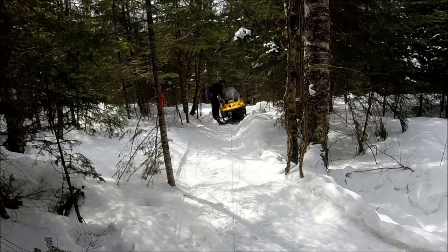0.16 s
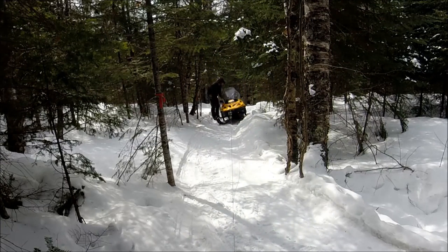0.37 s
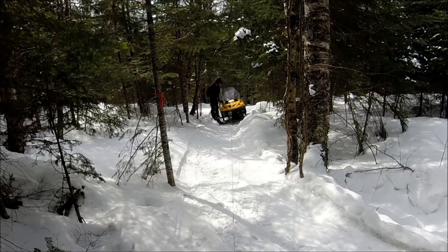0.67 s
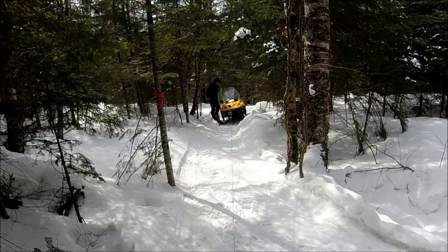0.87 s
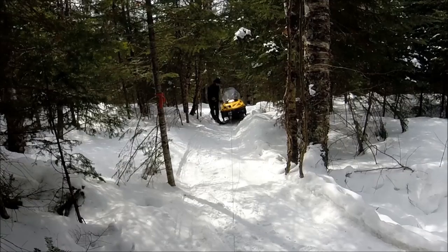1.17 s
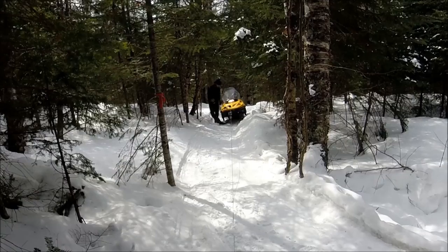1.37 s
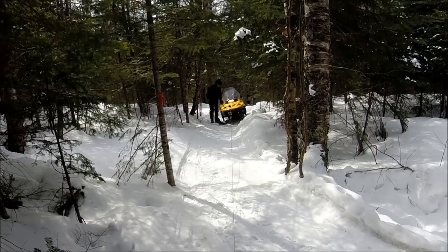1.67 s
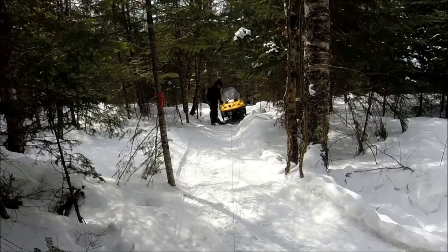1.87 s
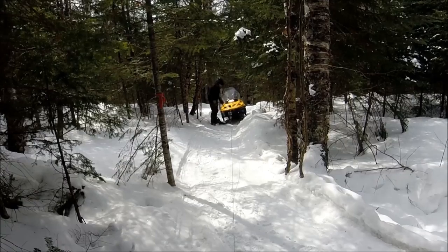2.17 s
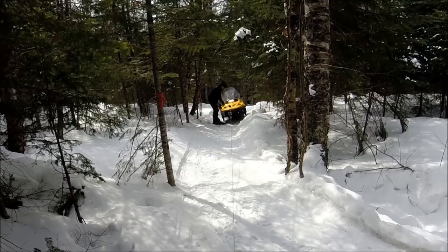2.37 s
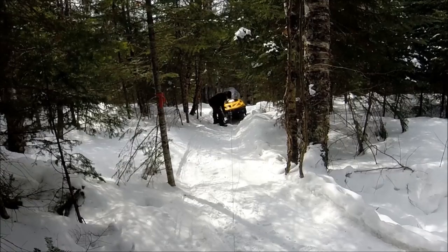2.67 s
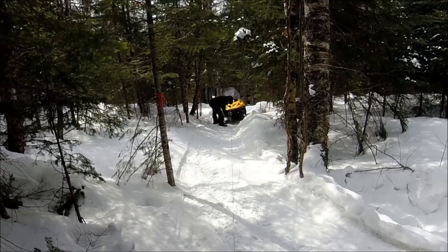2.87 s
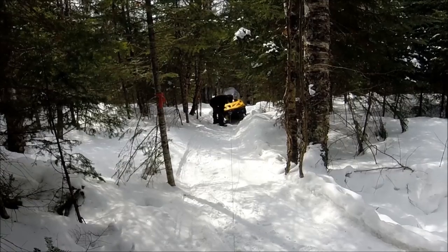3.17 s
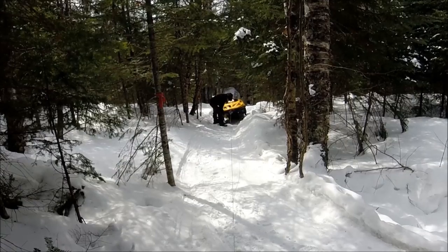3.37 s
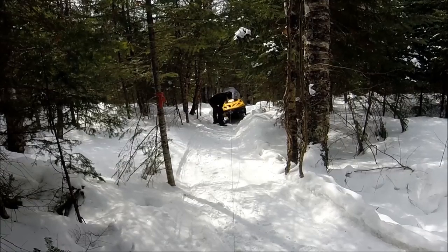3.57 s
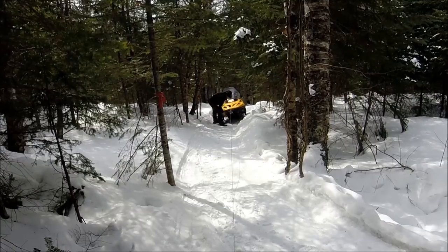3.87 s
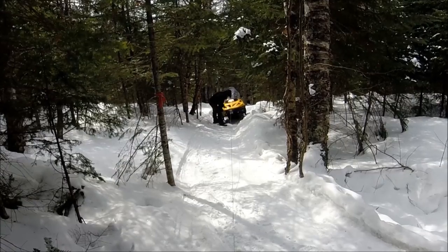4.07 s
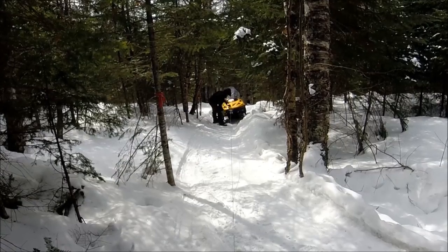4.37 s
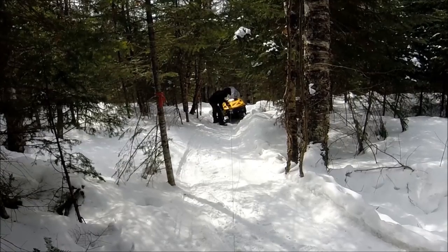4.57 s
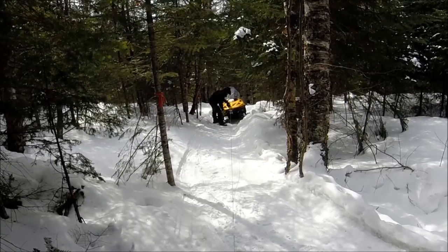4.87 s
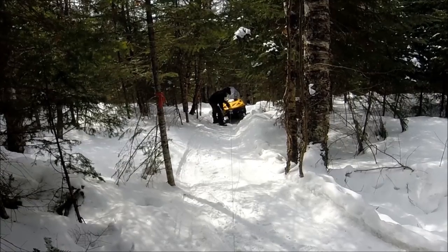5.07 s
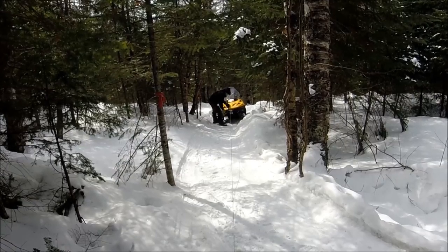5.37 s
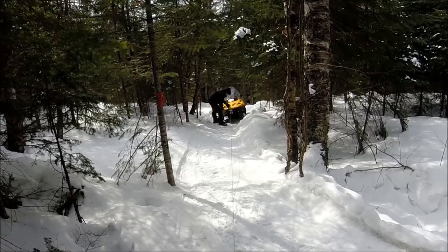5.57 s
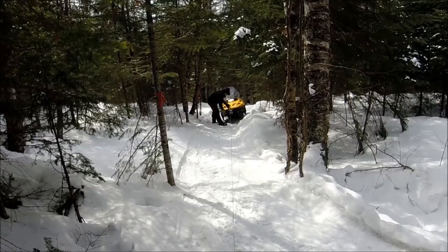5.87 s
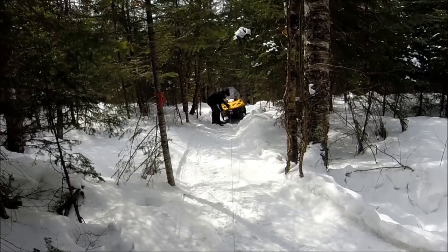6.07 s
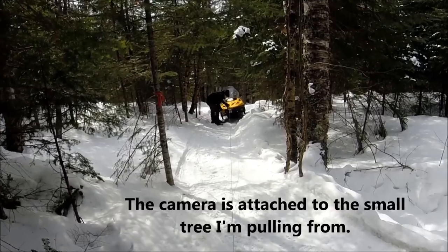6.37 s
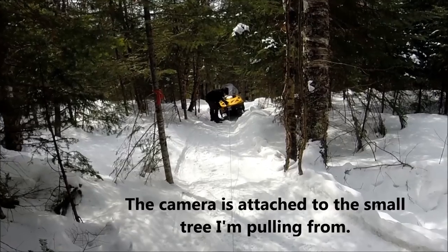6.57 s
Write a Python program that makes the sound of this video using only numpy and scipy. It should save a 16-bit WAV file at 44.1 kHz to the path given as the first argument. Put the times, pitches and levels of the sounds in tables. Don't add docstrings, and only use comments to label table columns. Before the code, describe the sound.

A snowmobile some distance away cranks with a quick rasp, then idles unevenly: low pulsing strokes, scattered single and paired pops, airy exhaust puffs and rattling panels. Light metallic taps and a dragging boot come late in the idle. A brief dropout breaks the scene; the engine resumes and an electric winch bursts in close and loud, its taut rope sending whine, gritty grind and creaks into the tree trunk holding the microphone.

```python
import sys
import numpy as np
from scipy import signal
from scipy.fft import rfft, irfft
from scipy.io import wavfile
from scipy.ndimage import uniform_filter1d, minimum_filter1d

SR = 44100
rng = np.random.default_rng(int(sys.argv[2]) if len(sys.argv) > 2 else 0)


def to_linear_factor(level_db):
    exponent = np.asarray(level_db, float) / 20
    return 10 ** exponent


def wav_record(signal):
    frames = np.transpose(np.atleast_2d(signal))
    bounded = np.clip(frames, -1, 1)
    quanta = np.round(bounded * 32767).astype(np.int16)
    wavfile.write(sys.argv[1], SR, quanta)


N = 295911
t = np.arange(N) / SR

# f/Hz, level/dB per Hz
STARTER_TONE = [(180, -17), (300, 0), (377, -15.5), (467, -14), (507, -8), (559, -2), (913, 8), (2820, -12),
                (3380, -2), (4050, -1), (5350, 1.5), (7790, -16.5), (8740, -12), (15000, -35.5)]
# f/Hz, width/Hz, lift/dB
STARTER_RINGS = [(860, 70, 6), (1040, 60, 5), (1260, 120, 7), (1600, 200, 8), (2200, 50, 6), (3430, 70, 7),
                 (3660, 70, 6), (4520, 90, 8), (5370, 70, 8), (8680, 300, 8), (9910, 200, 11)]
# t/s, f/Hz
STROKE_RATE = [(0, 29), (.3, 35.5), (.9, 39), (1.1, 43), (1.4, 45.5), (2, 47), (4.7, 47.5), (5.1, 50.5),
               (5.7, 50.5), (6.2, 48.5), (6.7, 50)]
# t/s, level/dB
EFFORT = [(0, -15), (.1, -4), (.5, -5), (1.0, 2), (1.25, 0), (2.4, 0.5), (3.8, 1.5), (5.1, 2), (6.2, 2.5),
          (6.5, 3.5), (6.71, 2)]
# f/Hz, width/Hz, level/dB
SILENCER = [(56.5, 5.9, 12), (61.7, 6.1, 19)]
# f/Hz, level/dB per Hz
CLATTER = [(22, -0.5), (45, 8.5), (110, 5.5), (220, -4.5), (320, -10.5), (490, -8), (610, -17.5),
           (960, -2.5), (1190, -10), (1430, -19), (1820, -18.5), (2800, -32), (3300, -27.5), (6800, -44),
           (16000, -55)]
# f/Hz, width/Hz, lift/dB
PANELS = [(3390, 150, 1.5), (770, 50, 6), (950, 60, 4), (1170, 70, 7), (1810, 60, 6), (2370, 16, 5),
          (3450, 300, 2), (5050, 300, 2)]
# t/s, level/dB
LONERS = [(.1363, -30.5), (.1803, -26), (.3237, -29), (.3817, -29.5), (2.4302, -25.5), (2.666, -27),
          (2.8596, -28.5), (3.2812, -31.5), (3.389, -32), (4.024, -30), (6.375, -27.5), (6.537, -21.5),
          (6.679, -26)]
# t/s, first level/dB, second level/dB
DOUBLES = [(.211, -28.5, -23), (1.1342, -27.5, -25), (1.2708, -28.5, -24.5), (1.3332, -39, -32.5),
           (1.4243, -27.5, -23), (1.708, -24, -28.5), (1.9384, -27.5, -37), (2.131, -32, -29.5),
           (2.2989, -29, -30), (2.5365, -27, -26.5), (2.773, -36, -26), (2.9668, -27, -28),
           (3.092, -30.5, -26), (3.3031, -35.5, -33), (3.474, -27.5, -34), (3.5823, -28.5, -27),
           (3.7094, -25, -26), (3.8344, -25, -28), (3.94, -32, -27.5), (4.3012, -27, -27),
           (4.4254, -25, -28.5), (4.7423, -28.5, -24.5), (5.3704, -30.5, -24.5), (5.5287, -24.5, -22)]
# t/s, first level/dB, second level/dB
ANSWERS = [(.467, -26.5, -27), (.633, -26, -28.5), (.7934, -26.5, -29.5), (.9444, -25.5, -26),
           (1.511, -29, -24), (1.813, -28, -26.5), (2.0015, -28, -28.5), (2.172, -26.5, -27.5),
           (3.1754, -29.5, -31), (4.1305, -26, -29), (4.5729, -26, -27.5), (4.8685, -26.5, -24),
           (5.0331, -25, -24.5), (5.1923, -24.5, -27.5), (5.6855, -23.5, -27.5), (5.8475, -23.5, -27.5),
           (6.0082, -24.5, -26), (6.1713, -24.5, -25)]
# f/Hz, width/Hz, level/dB
BANG_RING = [(482, 19.4, -0.5), (514.5, 8.6, 0.5), (463, 81, -16.5), (380, 100, -15.5), (910, 180, -32.5)]
# f/Hz, level/dB per Hz
JET = [(2500, -58.5), (4800, 10.5), (7200, -13), (8700, -1), (10200, -23.5), (15000, -30)]
# f/Hz, level/dB per Hz
GAS = [(600, 3), (1000, -1.5), (2000, -4.5), (2800, -14.5), (3500, -9.5), (5200, -15), (6300, -16),
       (7200, -25.5), (8700, -25), (15000, -41.5)]
# t/s, level/dB, f/Hz
KNOCKS = [
    (0.77, -34, 1070),
    (4.299, -21, 830),
    (4.991, -25, 940),
    (5.946, -29, 1000),
]
# t/s, level/dB
WINCH_EFFORT = [
    (6.343, -24.5),
    (6.349, -7),
    (6.365, 2),
    (6.4, -1),
    (6.45, -4),
    (6.5, 1.5),
    (6.56, -1.5),
    (6.63, -1),
    (6.71, 2),
]
# multiple of pitch/1, level/dB
WHINE = [(1, 1), (2, -1.5), (3, -1), (4, -12.5), (5, -13.5), (6, -33), (8, -36), (10, -39)]
# f/Hz, width/Hz, level/dB
TRUNK = [(868, 153, 0.5), (441, 33, -8.5), (1070, 37, -32.5), (1094, 81, -42), (1553, 130, -25),
         (1320, 1500, -28.5), (2675, 870, -40), (195, 150, -17.5)]
# t/s, peak level/dB, f/Hz, length/ms
SHUDDERS = [(6.3594, -12, 792, 18), (6.3679, -10, 830, 2.4), (6.391, 1, 831, 13.3), (6.4119, -9.5, 860, 16),
            (6.4299, -12.5, 887, 8.6), (6.451, -9, 862, 15), (6.4744, -6.5, 850, 6.6),
            (6.4869, -10, 816, 19), (6.5098, -11, 884, 27), (6.5601, -11, 905, 7.8),
            (6.5902, -8.5, 870, 7.3), (6.613, -5, 873, 14), (6.6237, -9.5, 884, 20.2),
            (6.6595, -26, 848, 6.9), (6.6747, -13.5, 920, 15), (6.6907, -3.5, 905, 11),
            (6.7034, -6.5, 895, 8.6)]
# t/s, level/dB, f/Hz
CREAKS = [
    (6.3847, -42.5, 2200),
    (6.4566, -29.5, 3020),
    (6.533, -24, 2340),
    (6.64, -30, 3360),
    (6.6964, -23, 2190),
]
# start t/s, end t/s
SILENCE_S = (6.1953, 6.2286)

STARTER_DB, STARTER_SWELL_DB_S, STARTER_OFF_S, STARTER_FADE_DB_S = -40, 23, .23, 438
STARTER_TAIL_DB, STARTER_TAIL_DB_S = -51, 120
PUMP_DB, KICK_DB, KICK_S = -38, .5, .042
CLATTER_DB, CLATTER_PER_EFFORT = -58.5, .4
HUM_DB, HUM_PEAK_S, HUM_NARROW_DB = -50, .44, 18
FIRED_SPEEDUP = 1.012
BANG_MS, DIP_MS, JET_RISE_S = 5.0, 4.5, .0035
HISS_DB, HISS_PER_BANG_DB = -53, 1.39
COLD_S, COLD_SPREAD_S, COLD_BOOM_DB, COLD_GULP_DB = 1.1, .08, 4, -14
WARM_S, WARM_SPREAD_S, WARM_GULP_DB = 3.4, .25, -16
GULP_DB, GULP_AT_STROKE, GULP_WIDTH_STROKE = -41.5, .1, .1
KNOCK_MS, SNAP_DB = .5, 6
SCRAPE_S, SCRAPE_WIDTH_S, SCRAPE_DB, SCRAPE_HZ = 4.24, .094, -45, 850
WINCH_ON_S, SPIN_UP_S, SPIN_UP_SHAPE = 6.343, .034, 1.4
START_HZ, RUN_HZ, SAG_HZ_S2 = 145.3, 325.2, 107
WHINE_DB, WHINE_PER_EFFORT, FLICKER_DB, GRIND_DB = -27, .49, 1.4, -20
SURGE_DB, SURGE_S, SURGE_WIDTH_S = 8, .022, .013


def rms1(x):
    return x / np.sqrt(np.mean(x ** 2))


def band(x, hz, width_hz):
    return signal.lfilter(*signal.iirpeak(hz, hz / width_hz, fs=SR), x)


def body(x, modes):
    return sum(to_linear_factor(db) * band(x, hz, width_hz) for hz, width_hz, db in modes)


def butter(x, order, hz, kind="low"):
    return signal.sosfilt(signal.butter(order, hz, kind, fs=SR, output="sos"), x)


def walk(rate_hz):
    k = int(SR / rate_hz)
    return rms1(uniform_filter1d(uniform_filter1d(rng.standard_normal(N), k), k))


def noise(tone, rings=(), modes_db=3.0):
    f = np.fft.rfftfreq(N, 1 / SR) + 1
    hz, db = np.transpose(tone)
    db = np.interp(np.log(f), np.log(hz), db, left=-90, right=-90)
    db = db + sum(lift_db / (1 + (2 * (f - c) / w) ** 2) for c, w, lift_db in rings)
    db = db + modes_db * walk(170)[:len(f)]
    return rms1(irfft(rfft(rng.standard_normal(N)) * to_linear_factor(db), N))


def narrow_noise(hz1, width1_hz, hz2, width2_hz):
    return rms1(band(band(rng.standard_normal(N), hz1, width1_hz), hz2, width2_hz))


def curve(rows):
    return np.interp(t, *np.transpose(rows))


def spikes(s, db, push_ms=0):
    x = np.zeros(N)
    x[np.clip((np.asarray(s) * SR).astype(int), 0, N - 1)] = to_linear_factor(db)
    return np.convolve(x, np.hanning(int(push_ms * SR / 1000) + 3)[1:-1])[:N]


def fade(x, tau_s):
    return signal.lfilter([1], [1, -np.exp(-1 / (tau_s * SR))], x)


def starter():
    level_db = STARTER_DB + STARTER_SWELL_DB_S * t - STARTER_FADE_DB_S * np.maximum(t - STARTER_OFF_S, 0)
    tail_db = STARTER_TAIL_DB - STARTER_TAIL_DB_S * np.abs(t - STARTER_OFF_S)
    grind = noise(STARTER_TONE, STARTER_RINGS, modes_db=2.5)
    n = np.arange(N)
    grind = np.interp(n + np.cumsum(.013 * walk(14.85)), n, grind)
    low = butter(grind, 4, 2500) * to_linear_factor(2.9 * walk(73))
    high = butter(grind, 4, 2500, "high") * to_linear_factor(-3.5 + 2.9 * walk(70))
    return (low + high) * to_linear_factor(np.maximum(level_db, tail_db))


def firings():
    rows = list(LONERS)
    for table, strokes in ((DOUBLES, 1), (ANSWERS, 3)):
        for s, first_db, second_db in table:
            rate_hz = FIRED_SPEEDUP * np.interp(s + .03, *np.transpose(STROKE_RATE))
            rows += [(s, first_db), (s + strokes / rate_hz, second_db)]
    return np.transpose(sorted(rows))


def crank(s):
    s = np.r_[-.03, s, 6.76]
    gaps_s = np.diff(s)
    count = np.round(gaps_s * np.interp(s[1:] - gaps_s / 2, *np.transpose(STROKE_RATE)))
    return np.interp(t, s, np.r_[0, np.cumsum(count)]) + .9 + .02 * walk(30)


def engine_effort(s, bang_db):
    kick = rms1(fade(fade(spikes(s, bang_db), KICK_S), .024))
    return curve(EFFORT) + KICK_DB * (kick - 1)


def pump(turn, effort_db):
    size = to_linear_factor(.57 * rng.standard_normal(400))[turn.astype(int)]
    saw = ((turn % 1) ** 2.6 - 1 / 3.6) * size
    saw = signal.sosfiltfilt(signal.butter(2, 230, fs=SR, output="sos"), saw)
    return rms1(saw - saw.mean() + body(saw, SILENCER[:1])) * to_linear_factor(PUMP_DB + effort_db)


def clatter(turn, effort_db):
    beat_db = .82 * np.cos(2 * np.pi * (turn - .3)) + 1.58 * walk(43)
    return noise(CLATTER, PANELS) * to_linear_factor(beat_db + CLATTER_DB + CLATTER_PER_EFFORT * effort_db + 19)


def rattle():
    return narrow_noise(3412, 60, 3432, 120) * to_linear_factor(-84 + 6 * walk(12))


def hum():
    tone = np.sin(2 * np.pi * np.cumsum(476 + 9 * walk(25)) / SR)
    level_db = HUM_DB - HUM_NARROW_DB * np.log((t + .05) / HUM_PEAK_S) ** 2 + 3.5 * walk(40)
    return tone * to_linear_factor(level_db)


def coldness():
    return 1 / (1 + np.exp((t - COLD_S) / COLD_SPREAD_S))


def bangs(s, bang_db):
    push = spikes(s - .0016, bang_db, push_ms=BANG_MS)
    dip = spikes(s - .0048, bang_db - 5, push_ms=DIP_MS)
    boom = body(spikes(s - .006, bang_db - 24.5, push_ms=BANG_MS), SILENCER[1:])
    ring = body(spikes(s - .0037, bang_db + 12.5, push_ms=.71), BANG_RING)
    return push - dip + boom * to_linear_factor(COLD_BOOM_DB * coldness()) - ring


def gas_hiss(s, bang_db):
    gas_db = HISS_DB + HISS_PER_BANG_DB * (bang_db + 27)
    puffs = spikes(s - .008, 2 * gas_db)
    jet_power = fade(fade(puffs, JET_RISE_S), .0077)
    jet = noise(JET, [(8620, 790, 6.5), (5230, 370, 7.2)]) * np.sqrt(jet_power) * to_linear_factor(-23.5)
    tail_power = fade(fade(puffs, .018) + to_linear_factor(-17.5) * fade(puffs, .074), .0054)
    return jet + noise(GAS, PANELS) * np.sqrt(tail_power) * to_linear_factor(-18.5)


def intake_gulp(turn):
    gulp = np.exp(-(((turn - GULP_AT_STROKE + .5) % 1 - .5) / GULP_WIDTH_STROKE) ** 2)
    warm = 1 / (1 + np.exp((WARM_S - t) / WARM_SPREAD_S))
    level_db = GULP_DB + COLD_GULP_DB * coldness() + WARM_GULP_DB * warm + 1.1 * walk(30)
    return (gulp - gulp.mean()) * to_linear_factor(level_db)


def engine():
    s, bang_db = firings()
    turn = crank(s)
    effort_db = engine_effort(s, bang_db)
    breath = pump(turn, effort_db) - intake_gulp(turn)
    exhaust = hum() + bangs(s, bang_db) + gas_hiss(s, bang_db)
    return breath + exhaust + clatter(turn, effort_db) + rattle()


def knocks():
    metal = 0
    for s, db, hz in KNOCKS:
        hit = spikes([s], db + 17, push_ms=KNOCK_MS)
        metal = metal + band(band(hit, hz, 135), 1.4 * hz, 1400)
    s, db, _ = np.transpose(KNOCKS)
    return metal + band(spikes(s, db - SNAP_DB), 2200, 1800)


def boot_scrape():
    drag = narrow_noise(SCRAPE_HZ, 190, SCRAPE_HZ, 300) * to_linear_factor(SCRAPE_DB + 3.6 * walk(65))
    return drag * np.exp(-((t - SCRAPE_S) / SCRAPE_WIDTH_S) ** 2)


def winch_whine(on_s, effort_db):
    spin_up = np.exp(-(on_s / SPIN_UP_S) ** SPIN_UP_SHAPE)
    hz = RUN_HZ - (RUN_HZ - START_HZ) * spin_up - SAG_HZ_S2 * on_s ** 2
    phase = 2 * np.pi * np.cumsum(hz * (1 + .0039 * walk(66))) / SR
    surge_db = SURGE_DB * np.exp(-((on_s - SURGE_S) / SURGE_WIDTH_S) ** 2)
    slack_db = 55 * np.clip(1 - hz / 319, 0, 1) * (t < 6.5)
    lines = 0
    for k, db in WHINE:
        line_db = db + FLICKER_DB * np.sqrt(k) * walk(79) - k * slack_db
        lines = lines + to_linear_factor(line_db) * np.sin(round(k) * phase)
    return lines * np.sqrt(2) * to_linear_factor(WHINE_DB + WHINE_PER_EFFORT * effort_db + surge_db)


def winch_grind(effort_db):
    teeth = rng.standard_normal(N) * to_linear_factor(1.8 * walk(220))
    grind = sum(to_linear_factor(db) * rms1(band(band(teeth, hz, w), hz, .78 * w)) for hz, w, db in TRUNK)
    return grind * to_linear_factor(GRIND_DB + effort_db)


def winch():
    on_s = np.maximum(t - WINCH_ON_S, 0)
    effort_db = curve(WINCH_EFFORT)
    return (on_s > 0) * (winch_whine(on_s, effort_db) + winch_grind(effort_db))


def rope_shudders():
    slips = 0
    for s, db, hz, ms in SHUDDERS:
        burst = np.exp(-(1665 * (t - s) / ms) ** 2)
        slips = slips + to_linear_factor(db) * burst * np.sin(2 * np.pi * hz * (t - s))
    return to_linear_factor(-.5) * slips


def bark_creaks():
    return sum(band(band(spikes([s], db + 25.5), hz, 250), hz, 500) for s, db, hz in CREAKS)


def scene():
    sled = engine() + starter() + knocks() + boot_scrape()
    return (sled + winch() + rope_shudders() + bark_creaks())[None]


def roll_off(x):
    return signal.sosfilt(signal.butter(12, 15630, fs=SR, output="sos"), x)


def record(dry):
    dry = butter(dry, 1, 15, "high")
    dull = signal.sosfilt(signal.ellip(8, .3, 50, 15150, fs=SR, output="sos"), dry)
    room = minimum_filter1d(np.minimum(.96 / (np.abs(dull) + 1e-9), 1), size=441)
    gain = uniform_filter1d(room, size=221)
    silent = (t > SILENCE_S[0]) & (t < SILENCE_S[1])
    fade_out = np.minimum((t[-1] - t) / .0031, 1)
    return roll_off(gain * dull * ~silent * fade_out)


dry = scene()
out = record(dry)
wav_record(out)
```